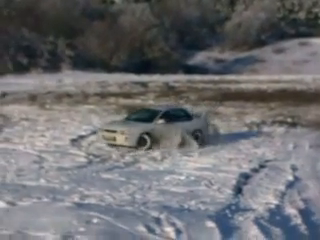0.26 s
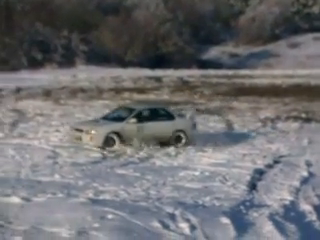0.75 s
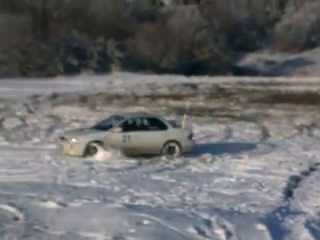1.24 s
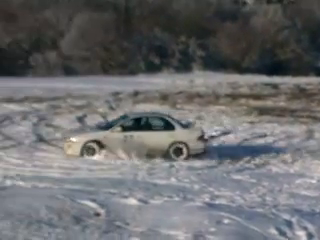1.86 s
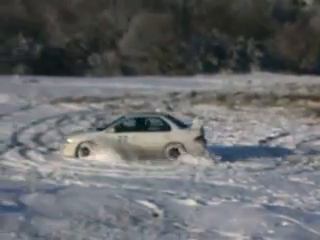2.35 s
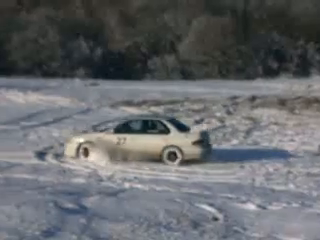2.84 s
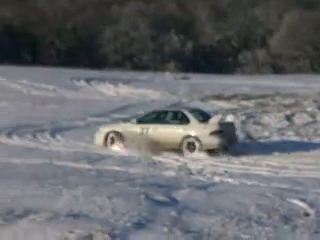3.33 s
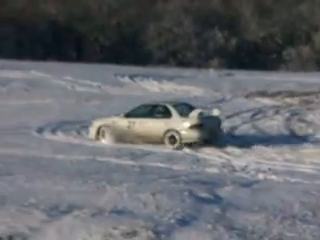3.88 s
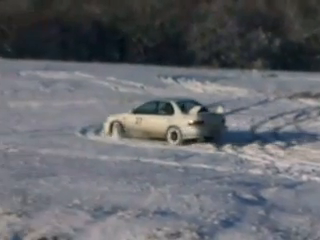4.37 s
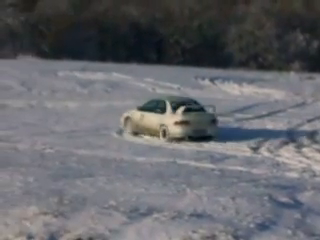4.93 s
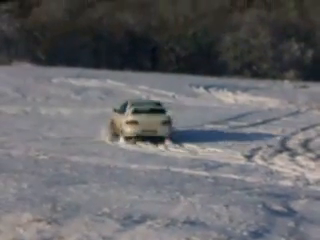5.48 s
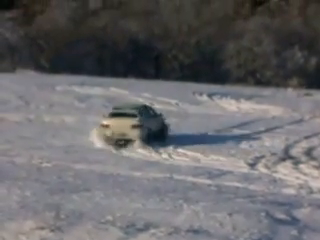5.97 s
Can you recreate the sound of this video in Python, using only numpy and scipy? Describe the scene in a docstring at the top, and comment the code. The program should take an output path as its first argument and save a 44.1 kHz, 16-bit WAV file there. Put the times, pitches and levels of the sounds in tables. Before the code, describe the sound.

A turbocharged car engine throbs and revs up and down, with sharp exhaust pops, as its tyres spin in snow.

```python
"""A snowy field, where a turbocharged flat-four car slides in circles, revving up and down.
The exhaust throbs in pairs of strong and weak puffs, each ringing the tailpipe into a growl.
Unburnt fuel ignites in sharp pops and, at the lowest revs, one soft whoof. The engine rasps and
crackles under load, gears and turbo whine faintly, and the spinning tyres throw grainy snow.
Under it all lies a bed of microphone hiss and low outdoor rumble."""
import sys
import numpy as np
from scipy import signal
from scipy.fft import rfft, irfft, next_fast_len
from scipy.io import wavfile
from scipy.ndimage import map_coordinates

SR = 44100
rng = np.random.default_rng(int(sys.argv[2]) if len(sys.argv) > 2 else 0)


def inscribe(sig):
    """Save sig as 16-bit PCM at rate SR to the path in sys.argv[1].

    A 1-D sig is mono; a 2-D sig holds one channel per row.
    Samples are clipped to [-1, 1] before scaling.
    """
    pcm = np.round(np.clip(np.atleast_2d(sig).T, -1, 1) * 32767)
    wavfile.write(sys.argv[1], SR, pcm.astype(np.int16))


N = 273375

# the revs, four firings to an engine cycle: [time_s, firing_hz]
REVS = [(0.0, 86.4), (0.103, 100.9), (0.295, 116.4), (0.519, 105.8), (0.835, 78.1), (1.076, 65.34),
        (1.531, 59.9), (1.811, 70.86), (2.025, 74.46), (2.399, 60.54), (2.565, 52.25), (3.021, 69.1),
        (3.404, 59.57), (3.681, 53.5), (3.853, 53.47), (4.097, 44.83), (4.378, 39.2), (4.484, 48.62),
        (4.622, 49.16), (4.977, 64.84), (5.819, 94.34), (6.014, 99.4), (6.2, 90.86)]
# presses of the accelerator: [down_s, lifted_s, depth_fraction]
THROTTLE = [(-.06, 0.31, 0.95), (0.48, 0.7, 0.5), (1.12, 1.556, 0.32), (1.47, 1.947, 0.65),
            (2.553, 2.946, 0.65), (2.941, 4.12, 0.27), (4.348, 5.942, 0.61)]
# the car's nose turns away from the listener (0 is nose-on): [time_s, heading_deg]
HEADING = [(0, 31), (1, 30), (2, 94.5), (4, 111), (5, 152), (5.82, 188), (6.2, 173)]

# How each layer rides the driving, from a base of coasting side-on at cruise speed:
# [base_db, full_load_db, revs_db_per_octave, nose_on_db]
BOOM_RIDE = (-41, 13.5, -9.5, 0)  # exhaust note at the firing rate
BARK_RIDE = (-54, 33.5, 1.5, 4.05)  # its octave
BURBLE_RIDE = (-43, 16, -19, 1.86)  # the unequal cylinder banks
OVERTONE_RIDE = (-62.5, 18, -2.5, -3)
GROWL_RIDE = (-67, 15.5, 0.5, -1.5)
RUSH_RIDE = (-69.5, 19, 3.5, -.5)
RASP_RIDE = (-67.5, 11.5, 1, 4.5)
CRACKLE_RIDE = (-79.5, 25, -9, -1.5)
SNOW_RIDE = (-68, 3, 0.5, 6.5)
WHINE_RIDE = (-68, -9, 6, 7)

# exhaust partials: [multiple_of_cycle_rate, gain_db]
EXHAUST_HARMONICS = [(3, 12), (4, 1.5), (5, 11.5), (7, 1), (8, 2), (9, -5), (11, -15.5), (12, 1),
                     (13, -9.5), (15, -16), (16, 0.5), (17, -21), (19, -11), (20, -5.5), (24, -11)]
# open tailpipe's growl: [multiple_of_lowest_mode, gain_db]
GROWL_MODES = [(1, 5.5), (2, -7), (2.9, -13)]
# tyres bite into the snow: [centre_s, level_db, width_s]
SNOW_SPURTS = [(0.906, -54.5, 0.045), (1.144, -55, 0.026), (1.263, -48.5, 0.0058), (1.513, -52, 0.038)]
# meshing gear teeth: [multiple_of_firing_rate, gain_db]
GEAR_MESHES = [(10.3, -2), (29.35, -4.5), (35.2, -7.5)]
# rise and fall of the hiss: [time_s, relative_level_db]
HISS_FADER = [(0.0, -75), (0.43, -74), (1.42, -70), (2.05, -72), (2.66, -68.5), (3.05, -71), (4.42, -66.5),
              (5.61, -72.5), (6.2, -71)]
# exhaust pops; thud, mid (1-1.5 kHz) and high are trims: [start_s, level_db, thud_db, mid_db, high_db]
POPS = [(0.015, -34, 0, -3, -13), (.528, -32.5, 4, 4.5, -3.5), (3.7631, -19.5, 1, 5.5, 3.5),
        (4.165, -20, -14, 2, -5), (4.922, -26, -6, -6, 0), (5.089, -29, -14, -3, -1.5),
        (5.198, -28, -3, -4, -0.5), (5.325, -29.5, -21, -4, -7), (5.386, -34, 0, -3, -1),
        (5.548, -34, -8, -2.5, -6), (5.654, -28.5, -6, -7, -6.5)]
# tailpipe's ring after a pop: [pitch_hz, gain_db, t60_s]
POP_MODES = [(504, -3.5, 0.026), (727, -2.5, 0.014), (848, -2.5, 0.027), (1068, 3, 0.014),
             (1261, -2.5, 0.017), (1840, -4, 0.012), (2280, -8.5, 0.012), (2640, -8.5, 0.008),
             (4100, -26, 0.016)]
# turbo whines, and at 2.21 s a brief gear whine on the overrun: [centre_s, width_s, pitch_hz, glide_hz_per_s,
# level_db]
GLIDING_WHINES = [(0.222, 0.29, 2390, -13, -69), (0.496, 0.45, 3310, -100, -72.5),
                  (0.849, 0.2, 2747, -300, -66), (2.21, 0.065, 2380, -1000, -67.5),
                  (3.579, 0.31, 1920, 1.5, -76.5)]

# Tone colours, as EQ curves: [frequency_hz, gain_db]
SILENCER_BOOM_EQ = [(40, -11), (55, -2.5), (72, 3.5), (90, 7.5), (110, 2.5), (135, -1), (155, -14),
                    (180, -15.5), (230, -24)]  # silencer on boom and bark
SILENCER_BURBLE_EQ = [(40, -66), (70, -26.5), (100, -9), (125, 0), (145, 4), (170, -4), (195, -8),
                      (225, -4), (260, -3.5), (300, -8), (360, -9.5), (440, -31), (600, -4.5)]  # silencer on burble and overtones
RUSH_EQ = [(60, -26), (150, 13.5), (260, 2.5), (400, 1.5), (520, -3.5), (680, -5), (850, -12), (1200, -41),
           (3000, -66)]  # turbulence at the tailpipe
RASP_EQ = [(400, -23), (750, 3), (1000, 3), (1250, -1.5), (1500, 2), (1850, -7.5), (2300, -5), (3500, -34),
           (8000, -60)]  # engine rasp
SNOW_EQ = [(600, -5), (1500, 0), (2000, 4.5), (2400, -1), (2850, -3.5), (3300, -5.5), (4000, -27.5),
           (6500, -15.5), (9000, -34)]  # thrown snow
BODY_EQ = [(350, 0), (450, -8), (540, 3), (660, 1.5), (780, 0.5), (900, -4), (1750, -2), (1930, -1),
           (2120, -3.5), (2380, 1), (2550, -1.5), (2800, 3.5), (3050, -5), (3300, 1)]  # resonances of the engine bay and wheel wells
GEARBOX_EQ = [(400, -9), (760, 1), (950, -30), (1160, 4), (1350, 7), (1620, 5), (2000, -17), (2250, -8),
              (2400, 5.5), (2550, -27), (3000, -22)]  # resonances of the gear housing
HISS_EQ = [(100, 19), (2000, 1.5), (4000, 2), (7500, 0), (10000, 1.5), (12500, 4), (14200, 5)]  # microphone hiss
WHOOF_EQ = [(100, -12), (190, 8), (238, 7.5), (300, -5.5), (550, -7.5), (850, -7.5), (1300, -18.5),
            (2200, -32), (5000, -43)]  # soft afterburn
CRACKLE_EQ = [(350, -28), (700, 8.5), (1200, -3.5), (1500, -6), (1900, 9), (2300, -7), (2750, -8),
              (3400, -22), (6000, -36)]
CRUNCH_EQ = [(250, -26), (650, 5.5), (1500, 5), (2500, -1), (3600, -24), (7000, -23), (11000, -35)]
RUMBLE_EQ = [(15, -29), (40, 6.5), (60, 7.5), (130, 3.5), (220, 0), (500, -56), (2000, -58)]

TIME_S = np.arange(N) / SR


def amp(db):
    """Decibels to gain."""
    return 10 ** (np.asarray(db) / 20)


def unit(x):
    """Scale to rms 1."""
    return x / np.sqrt(np.mean(x ** 2) + 1e-20)


def eq_db(eq, hz):
    """An EQ curve's gain at hz, read on a log frequency axis."""
    knots_hz, gains_db = np.transpose(eq)
    return np.interp(np.log(hz + 1), np.log(knots_hz + 1), gains_db)


def automation(points):
    """Straight ramps through (time, value) points."""
    return np.interp(TIME_S, *np.transpose(points))


def wobble(rate):
    """A smooth random curve, rate knots a second."""
    return map_coordinates(rng.standard_normal(int(N * rate / SR) + 4), [TIME_S * rate])


def filtered(x, response):
    """Shape x by a gain that depends on frequency."""
    size = next_fast_len(N + 8192)
    return irfft(rfft(x, size) * response(np.fft.rfftfreq(size, 1 / SR)), size)[:N]


def noise(eq):
    """Coloured noise of rms 1."""
    return unit(filtered(rng.standard_normal(N), lambda hz: amp(eq_db(eq, hz))))


def swell(centre_s, width_s):
    """A bell-shaped envelope."""
    return np.exp(-.5 * ((TIME_S - centre_s) / width_s) ** 2)


def engine_load(rise_s=0.044, fall_s=0.23):
    """Load, 0-1, builds quickly with each press of the accelerator and dies slowly after the lift."""
    load = np.zeros(N)
    for down_s, lifted_s, depth in THROTTLE:
        attack = 1 - np.exp(-np.maximum(TIME_S - down_s, 0) / rise_s)
        release = np.exp(-np.maximum(TIME_S - lifted_s, 0) / fall_s)
        load = np.maximum(load, depth * attack * release)
    return load


def driving(firing_hz, cruise_hz=60):
    """The controls that the levels ride: a constant, load, revs and facing."""
    octaves_above_cruise = np.log2(firing_hz / cruise_hz)
    nose_on = np.cos(np.radians(automation(HEADING)))
    return np.array([np.ones(N), engine_load(), octaves_above_cruise, nose_on])


def ride_db(ride, drive):
    """A layer's fader: the driving controls, weighted by its ride."""
    return np.asarray(ride) @ drive


def firings(angle, firing_hz, lead_s):
    """Number and age in seconds of the latest firing, lead_s ahead of the boom through the silencer."""
    count = np.maximum(2 * angle / np.pi + lead_s * firing_hz, 0)
    return count.astype(int), (count % 1) / firing_hz


def exhaust_throb(angle, firing_hz, drive, flutter_db=2, wander_rad=0.52):
    """Two strong puffs, then two weak: harmonics of the engine cycle, coloured by the silencer."""
    out = np.zeros(N)
    for order, gain_db in EXHAUST_HARMONICS:
        hz = order * firing_hz / 4
        if order in (4, 8):
            ride = BOOM_RIDE if order == 4 else BARK_RIDE
            level_db = ride_db(ride, drive) + eq_db(SILENCER_BOOM_EQ, hz)
        else:
            ride = BURBLE_RIDE if order < 12 else OVERTONE_RIDE
            level_db = ride_db(ride, drive) + eq_db(SILENCER_BURBLE_EQ, hz)
        if order >= 12:
            level_db += flutter_db * wobble(14)
        # a bank's two puffs lie a quarter cycle apart, which sets each harmonic's sign
        polarity = -np.sign(np.cos(np.pi * order / 4))
        # no two cycles are quite alike, so all but the firing note wander a little
        drift = 0 if order == 4 else wander_rad * wobble(5)
        out += polarity * amp(gain_db + level_db) * np.cos(order * angle + np.pi / 6 + drift)
    return out


def tailpipe_growl(angle, firing_hz, drive, t60_s=0.022, scatter_db=2, jitter=0.055, mode_ratio=6.81):
    """Each puff rings the open tailpipe at a slightly different pitch, loudest along the pipe's axis."""
    off_axis_deg = np.abs(180 - automation(HEADING))
    off_axis_loss_db = np.minimum(1.1 * off_axis_deg, 14.5)
    number, age_s = firings(angle, firing_hz, lead_s=0.008)
    strength, detune = rng.standard_normal((number.max() + 1, 2))[number].T
    lowest_hz = mode_ratio * firing_hz * (1 + jitter * detune)
    ring = sum(amp(db) * np.sin(2 * np.pi * ratio * lowest_hz * age_s) for ratio, db in GROWL_MODES)
    envelope = age_s * amp(scatter_db * strength - 60 * age_s / t60_s)
    return amp(ride_db(GROWL_RIDE, drive) - off_axis_loss_db) * unit(ring * envelope)


def rush_and_rasp(angle, drive, pulse_depth=0.32, grain_db=1.5):
    """Breathy tailpipe turbulence and rough engine rasp, both pumping with the firings."""
    pulse = np.exp(pulse_depth * np.cos(4 * angle + np.pi / 6))
    rush = unit(noise(RUSH_EQ) * pulse)
    rasp = unit(noise(RASP_EQ) * np.sqrt(pulse) * amp(grain_db * wobble(83)))
    return amp(ride_db(RUSH_RIDE, drive)) * rush + amp(ride_db(RASP_RIDE, drive)) * rasp


def engine_crackle(angle, firing_hz, drive, accent_db=4, scatter_db=0.7, t60_s=0.021):
    """Under load every firing gives a short crack; one cylinder of the four hits hardest."""
    number, age_s = firings(angle, firing_hz, lead_s=0.0058)
    hit_db = scatter_db * rng.standard_normal(number.max() + 1)[number]
    hit_db += accent_db * (number % 4 == 3)
    envelope = amp(hit_db - 60 * age_s / t60_s)
    return amp(ride_db(CRACKLE_RIDE, drive)) * unit(envelope * noise(CRACKLE_EQ))


def tyre_spray(drive, clump_db=2, grain_db=1.5):
    """Spinning tyres throw grainy snow, with crunchy spurts where they bite."""
    grains = unit(amp(clump_db * wobble(45) + grain_db * wobble(500)))
    spurts = sum(amp(db) * swell(centre_s, width_s) for centre_s, db, width_s in SNOW_SPURTS)
    crunch = spurts * noise(CRUNCH_EQ)
    spray = amp(ride_db(SNOW_RIDE, drive)) * noise(SNOW_EQ)
    return grains * (spray + crunch)


def gear_whine(angle, firing_hz, drive, flicker_db=2.5, waver_rad=0.8):
    """Meshing teeth track the revs and sing out where they cross a resonance of the housing."""
    fader_db = ride_db(WHINE_RIDE, drive)
    out = np.zeros(N)
    for ratio, gain_db in GEAR_MESHES:
        level_db = fader_db + gain_db + eq_db(GEARBOX_EQ, ratio * firing_hz) + flicker_db * wobble(12)
        out += amp(level_db) * np.sin(ratio * 4 * angle + waver_rad * wobble(50))
    return out


def background_bed(hiss_trim_db=7.5, rumble_db=-59, bump_db=-45):
    """Microphone hiss over a low outdoor rumble, which swells once into a dull bump."""
    bump = amp(bump_db) * swell(centre_s=0.573, width_s=0.07)
    rumble = (amp(rumble_db) + bump) * noise(RUMBLE_EQ)
    hiss = amp(automation(HISS_FADER) + hiss_trim_db) * noise(HISS_EQ)
    return hiss + rumble


def gliding_whines(flutter_hz=170):
    """Air through the turbo sings in narrow, breathy bands that glide; one brief band is the gears whining on
    the overrun."""
    out = np.zeros(N)
    for centre_s, width_s, pitch_hz, glide_hz_per_s, level_db in GLIDING_WHINES:
        phase = 2 * np.pi * np.cumsum(pitch_hz + glide_hz_per_s * (TIME_S - centre_s)) / SR
        band = unit(wobble(flutter_hz) * np.cos(phase) + wobble(flutter_hz) * np.sin(phase))
        out += amp(level_db) * swell(centre_s, width_s) * band
    return out


def tailpipe_ring(age_s, mid_db, high_db, attack_s=0.00025):
    """A bang sets the pipe's modes ringing briefly; the peak is scaled to 1."""
    ring = np.zeros(len(age_s))
    for i, (hz, gain_db, t60_s) in enumerate(POP_MODES):
        trim_db = 0 if hz < 1000 else mid_db if hz < 1500 else high_db
        envelope = amp(gain_db + trim_db + rng.normal() - 60 * age_s / t60_s)
        ring += (-1) ** i * envelope * np.sin(2 * np.pi * hz * age_s)
    ring *= 1 - np.exp(-age_s / attack_s)
    return ring / np.abs(ring).max()


def exhaust_pops(crack_t60_s=0.0067, thud_hz=320, thud_t60_s=0.019, echo_s=0.0099, echo_db=-21):
    """Unburnt fuel ignites: a crack and a pipe ring over a low thud, with one weak reflection."""
    out = np.zeros(N + SR)
    age_s = np.arange(SR // 10) / SR
    lowpass = signal.butter(1, 1900, fs=SR)
    loudest_db = max(row[1] for row in POPS)
    for start_s, level_db, thud_db, mid_db, high_db in POPS:
        ring = tailpipe_ring(age_s, mid_db, high_db)
        # stronger bangs steepen into a sharper shock front
        shock_db = high_db - 6 + 0.16 * (level_db - loudest_db)
        burst = amp(shock_db - 60 * age_s / crack_t60_s) * rng.standard_normal(len(age_s))
        crack = signal.lfilter(*lowpass, burst)
        thud_envelope = amp(thud_db - 60 * age_s / thud_t60_s) * (1 - np.exp(-age_s * thud_hz))
        thud = thud_envelope * np.sin(2 * np.pi * thud_hz * age_s)
        bang = amp(level_db) * (ring + crack + thud)
        out[round(start_s * SR):][:len(bang)] += bang
        out[round((start_s + echo_s) * SR):][:len(bang)] += amp(echo_db) * bang
    return out[:N]


def afterburn_whoof(level_db=-46):
    """A soft, slow afterburn at the lowest revs."""
    return amp(level_db) * swell(centre_s=4.295, width_s=0.037) * noise(WHOOF_EQ)


def scene():
    """The car and its surroundings, mixed in mono."""
    firing_hz = automation(REVS)
    # one turn per engine cycle; zero lies between the two strong puffs
    angle = 2 * np.pi * (0.29 + np.cumsum(firing_hz) / SR / 4)
    drive = driving(firing_hz)
    grit = rush_and_rasp(angle, drive) + engine_crackle(angle, firing_hz, drive) + tyre_spray(drive)
    body = filtered(grit, lambda hz: amp(eq_db(BODY_EQ, hz)))
    exhaust = exhaust_throb(angle, firing_hz, drive) + tailpipe_growl(angle, firing_hz, drive)
    backfires = exhaust_pops() + afterburn_whoof()
    whines = gear_whine(angle, firing_hz, drive) + gliding_whines()
    return (exhaust + backfires + body + whines + background_bed())[None]


def record(dry, cutoff_hz=14400):
    """A brick-wall low-pass takes the very top off the mix."""
    return filtered(dry[0], lambda hz: hz < cutoff_hz)[None]


dry = scene()
out = record(dry)
inscribe(out)
```